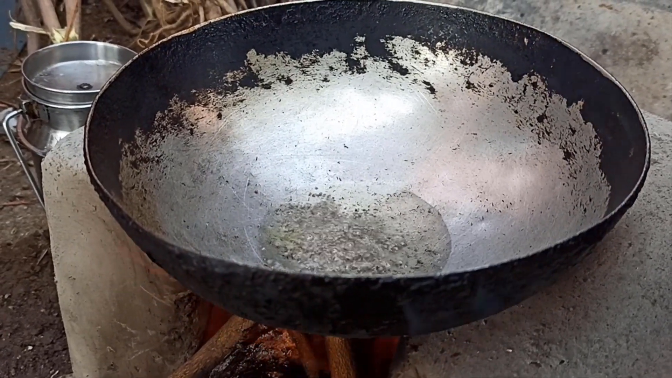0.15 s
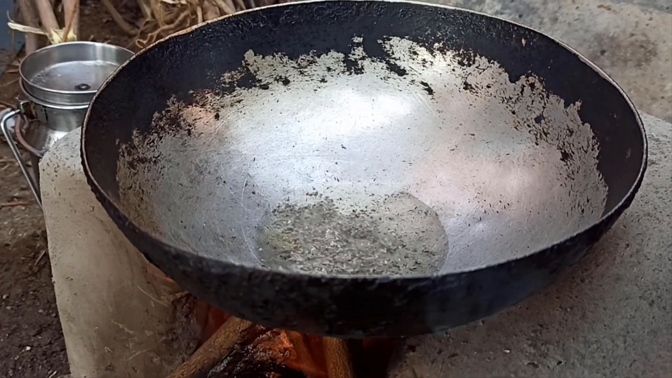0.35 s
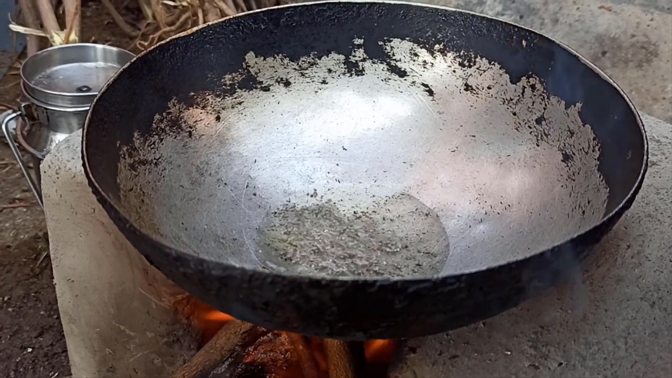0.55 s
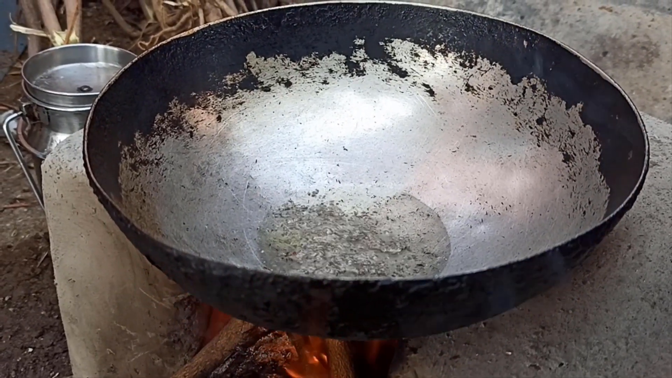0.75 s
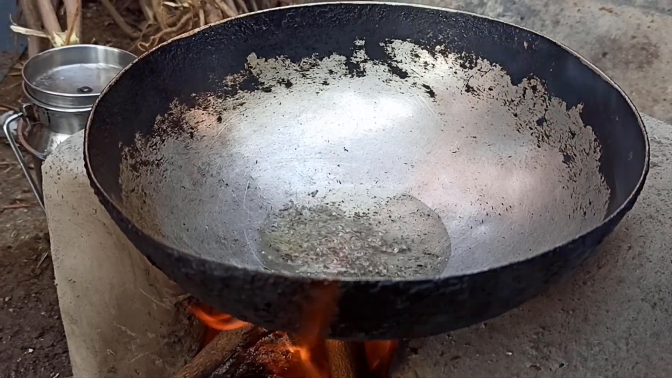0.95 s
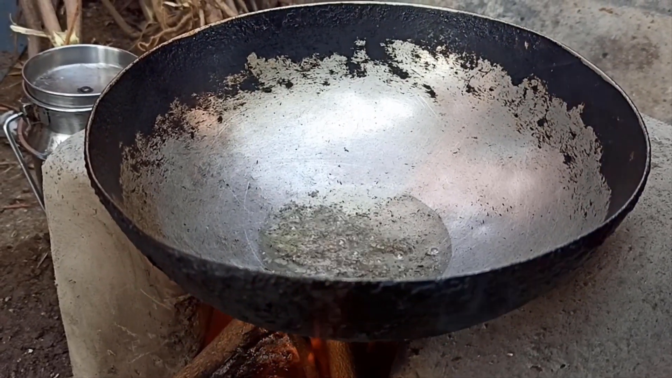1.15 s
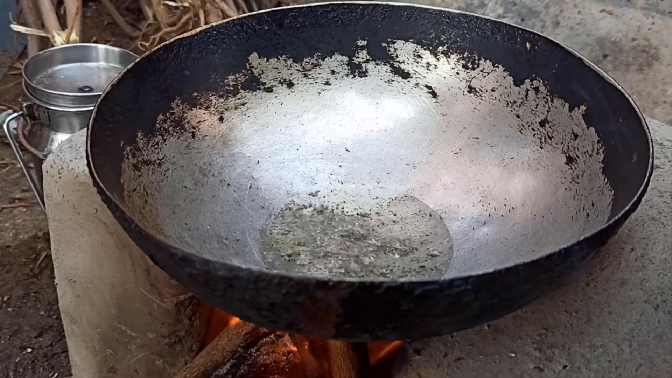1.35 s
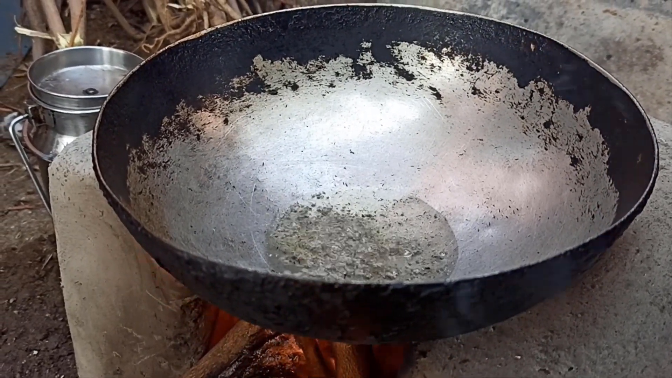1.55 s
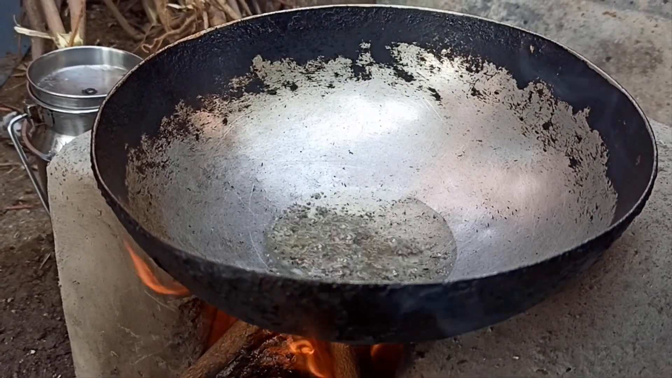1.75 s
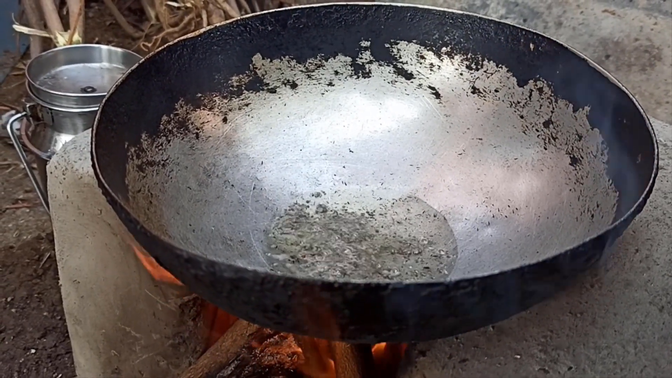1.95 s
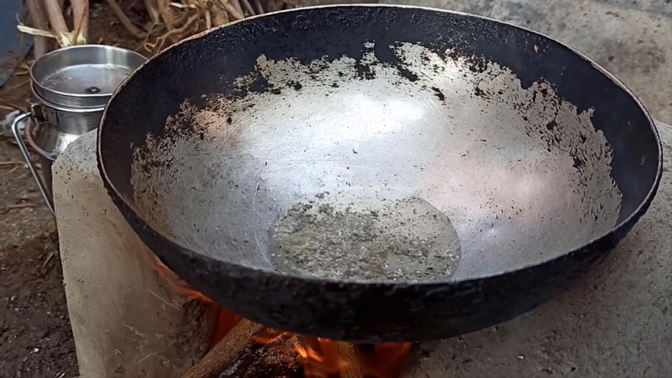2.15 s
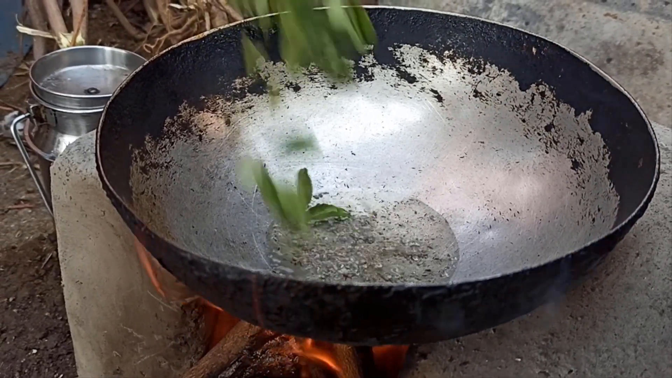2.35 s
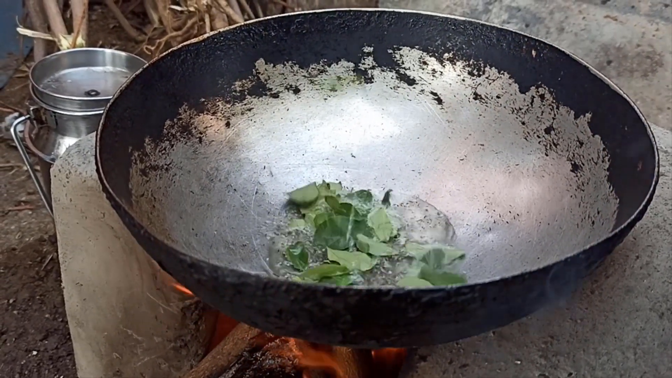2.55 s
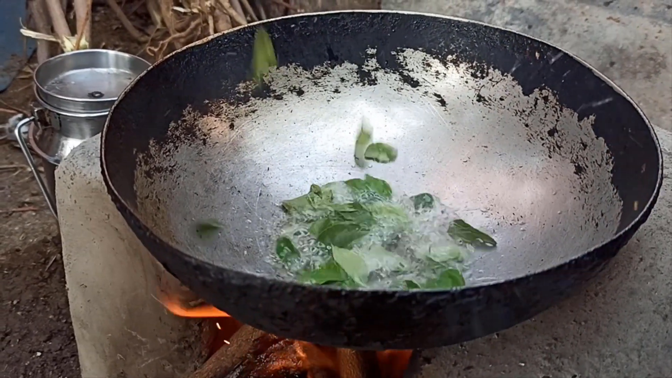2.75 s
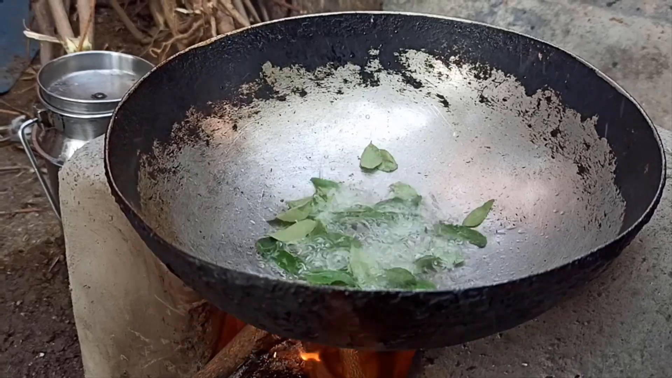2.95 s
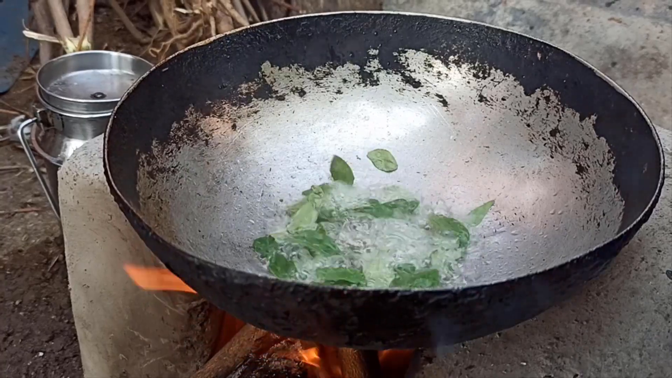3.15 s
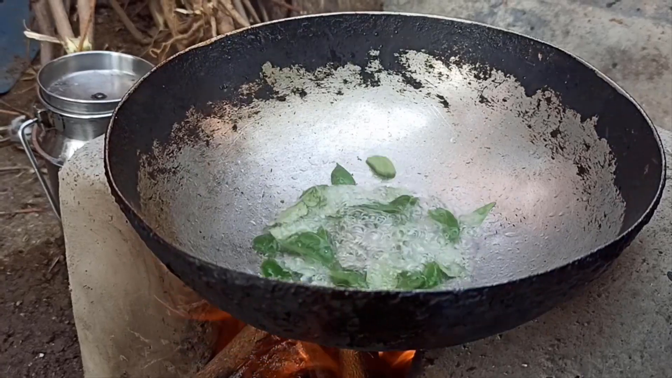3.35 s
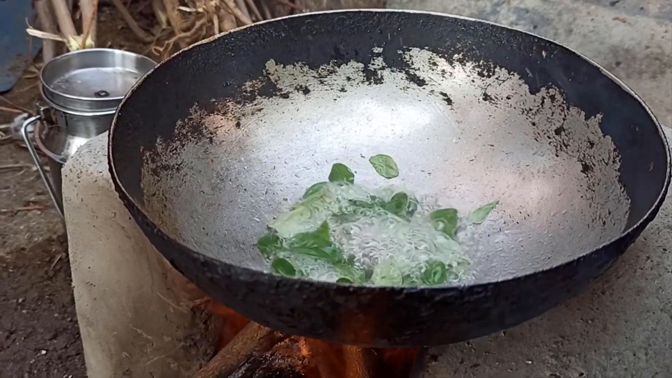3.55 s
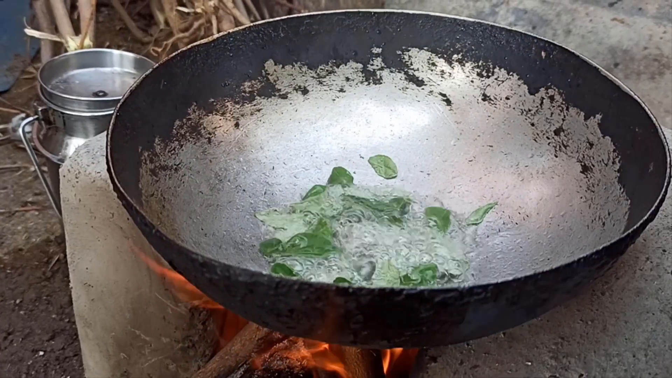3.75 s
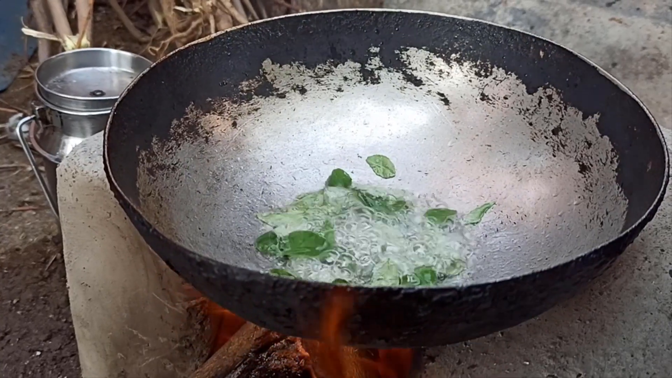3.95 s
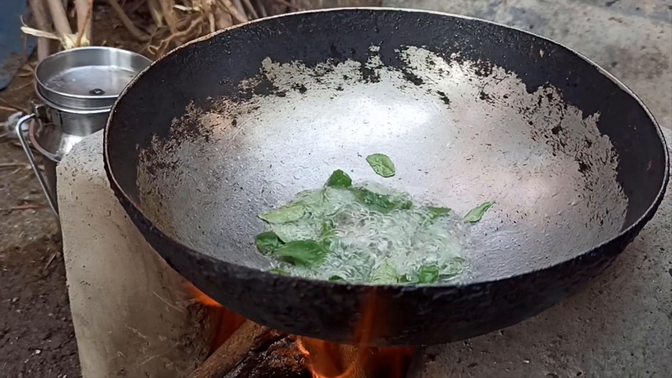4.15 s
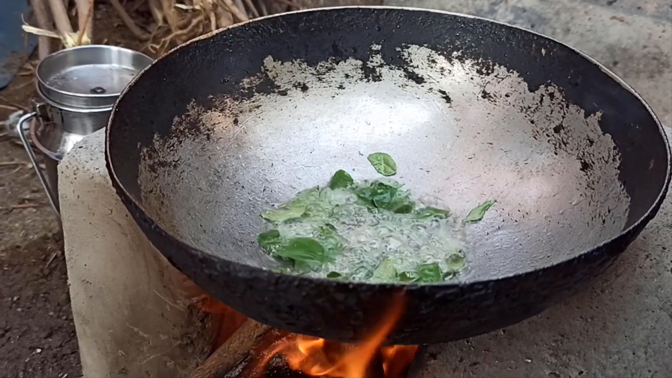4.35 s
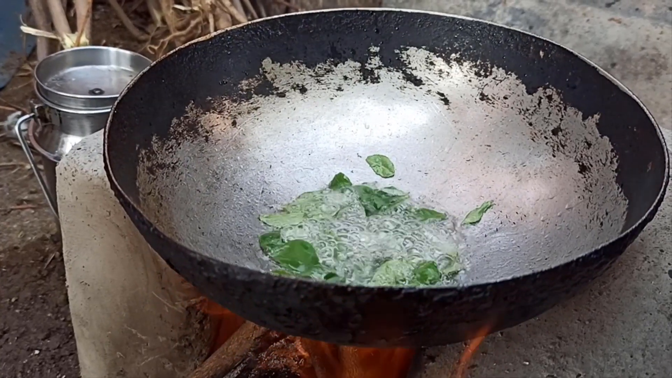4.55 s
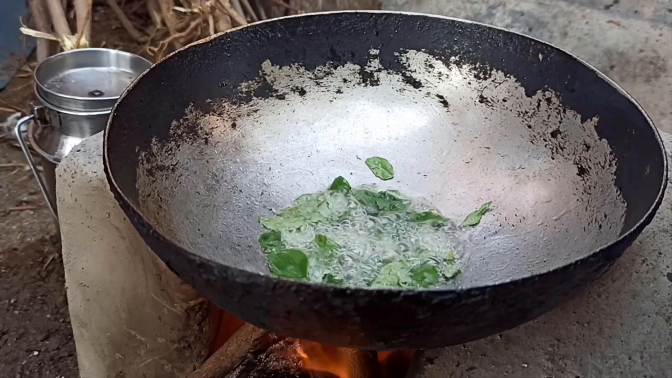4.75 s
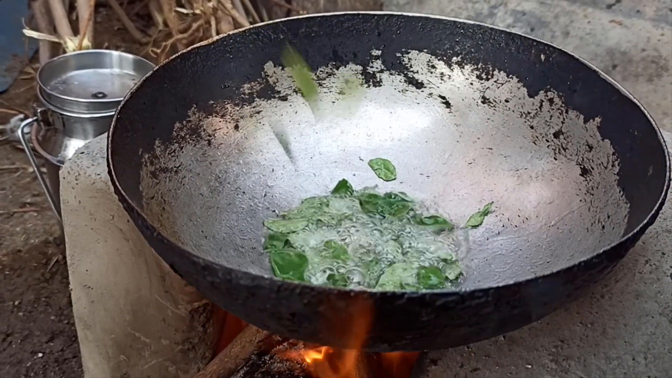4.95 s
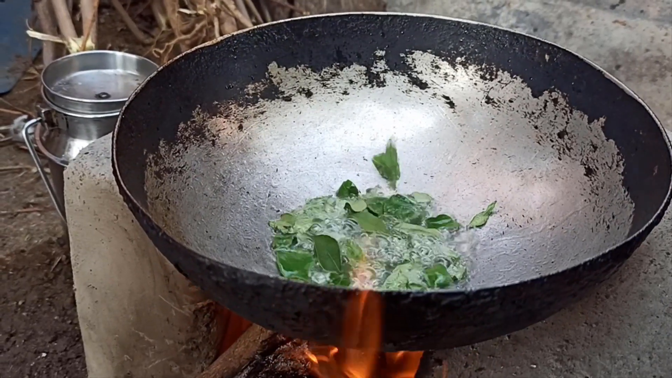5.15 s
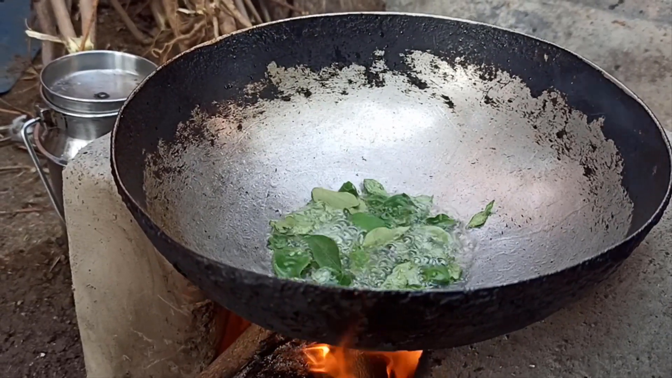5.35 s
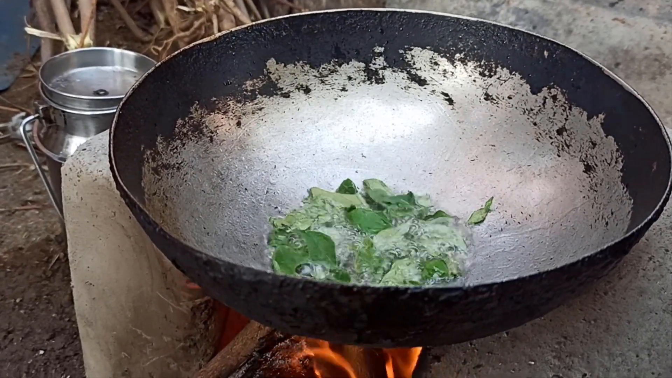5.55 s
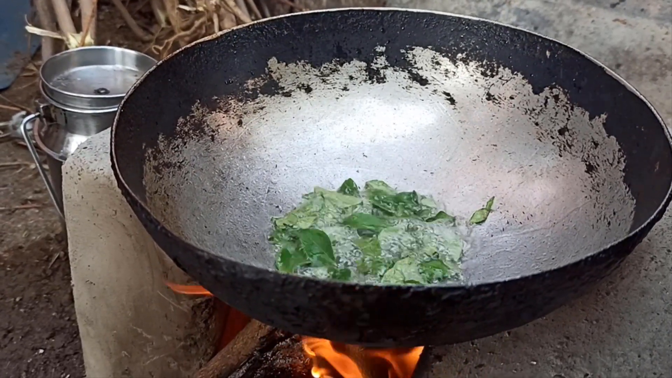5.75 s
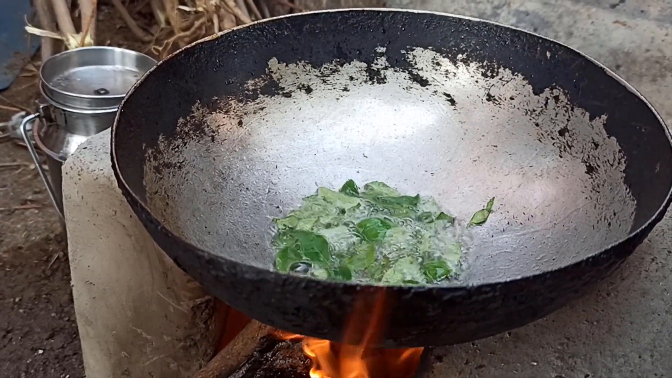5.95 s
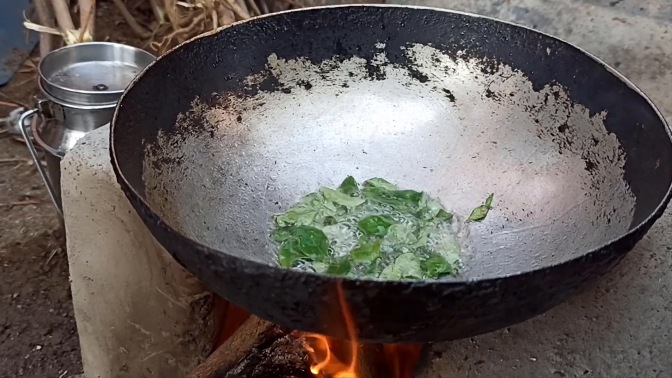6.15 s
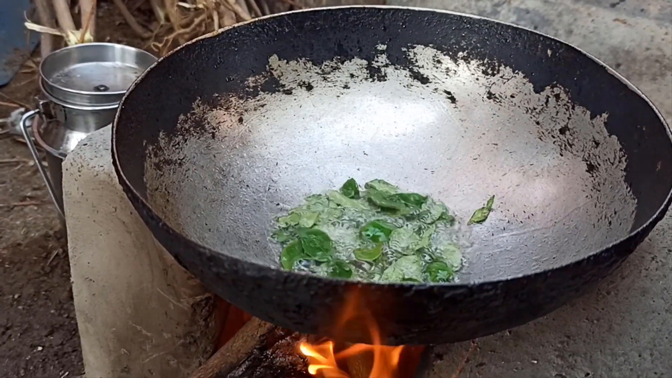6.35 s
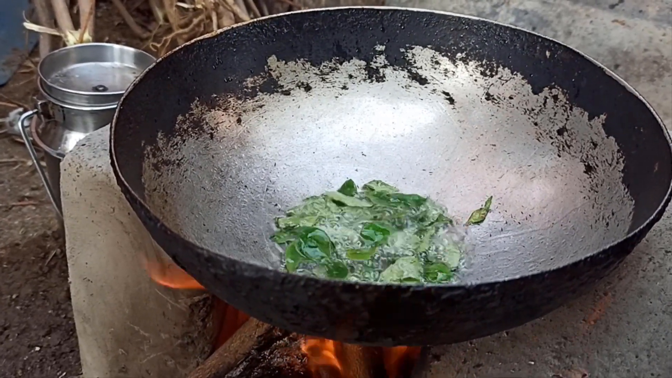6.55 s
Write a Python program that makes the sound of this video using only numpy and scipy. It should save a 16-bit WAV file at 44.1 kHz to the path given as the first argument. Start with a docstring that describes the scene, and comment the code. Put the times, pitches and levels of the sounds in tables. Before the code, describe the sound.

Quiet pops in an iron pan, a brief bird chirp, then a sudden violent burst of frying leaves that settles to uneven crackle and spatter.

```python
"""Seeds pop in hot oil in an iron pan over a wood fire outdoors, above a far engine's drone; a bird chirps.
Fresh leaves are thrown in and the oil erupts: steam bubbles burst as thumps, snaps and spray over a fine fizz.
Each burst is a click with a dying hiss that rings the pan's resonances; a wall nearby echoes the pan.
The air and a far rush are shaped noise, the drone is a stack of engine orders, the chirps are falling sines."""
import sys
import numpy as np
from scipy import signal
from scipy.fft import rfft, irfft, next_fast_len
from scipy.io import wavfile

SR = 44100
rng = np.random.default_rng(int(sys.argv[2]) if len(sys.argv) > 2 else 0)


def invert_db(x):
    """Field ratio 10**(x/20) for x, a level in decibels (scalar or array-like)."""
    u = np.asarray(x, float) / 20
    return 10 ** u


def master_out(mix):
    """Clip the mix to full scale and print it as 16-bit PCM to the path in sys.argv[1]."""
    frames = np.transpose(np.atleast_2d(mix))
    ceiling = np.clip(frames, -1, 1)
    pcm = np.round(ceiling * 32767).astype(np.int16)
    wavfile.write(sys.argv[1], SR, pcm)


N = 295470


def rms_one(x):
    """Scales a signal to rms 1."""
    return x / np.sqrt(np.mean(x ** 2) + 1e-20)


def at_hz(points, hz):
    """Reads a curve of (Hz, value) points along log frequency."""
    p = np.array(points, float)
    return np.interp(np.log(hz + 1), np.log(p[:, 0] + 1), p[:, 1])


def drift(rate_hz):
    """Slow random wander of spread 1: noise through two equal low-pass poles at rate_hz."""
    every = 40  # samples between computed points
    r = np.exp(-2 * np.pi * every * rate_hz / SR)
    noise = rng.standard_normal(N // every + 2002)
    slow = rms_one(signal.lfilter([1], [1, -2 * r, r * r], noise)[2000:])
    return np.interp(np.arange(N) / every, np.arange(len(slow)), slow)


def resonate(x, hz, width_hz):
    """Two-pole resonance with gain 1 on top."""
    r = np.exp(-np.pi * width_hz / SR)
    zeros = np.array([1, 0, -1]) * (1 - r * r) / 2
    poles = [1, -2 * r * np.cos(2 * np.pi * hz / SR), r * r]
    return signal.lfilter(zeros, poles, x + 1e-18)


def pair(alike):
    """Two noise channels that share a part: alike is their correlation."""
    mid, side = rng.standard_normal((2, N))
    alike = np.clip(alike, 0, 1)
    return np.sqrt(alike) * mid + np.sqrt(1 - alike) * np.array([side, rng.standard_normal(N)])


def grains(per_s, spread_db):
    """Random clicks, a few far larger than the rest; rms 1."""
    sizes = invert_db(spread_db * np.minimum(rng.exponential(1, N), 4))
    return rms_one(sizes * (rng.random(N) < per_s / SR))


# The frying in the pan. Each row: time in seconds, relative level of the fizz in dB,
# relative level of the boil (large bubbles under the leaves) in dB.
FRYING_LEVELS = [(0, -55, -70), (1.3, -60, -60.5), (2.28, -56.5, -67), (2.34, -42, -49), (2.44, -41, -46),
                 (2.46, -37, -28), (2.53, -30, -25.5), (2.6, -40, -29), (2.68, -30.5, -24),
                 (2.85, -30.5, -27), (3.1, -29, -33.5), (3.35, -35.5, -37), (3.6, -31.5, -42.5),
                 (4.3, -34.5, -42.5), (4.798, -34, -46), (5.401, -36.5, -44.5), (5.9, -37.5, -45),
                 (6.7, -42, -53)]
# Resonances of the pan bowl, by the part of a burst that drives them.
# Each row: frequency in Hz, width in Hz, relative level in dB.
THUMP_MODES = [(60, 67, -76), (304, 3470, -5), (720, 503, 9), (980, 630, -3)]
KNOCK_MODES = [(1233, 540, -7), (1750, 340, 2), (2360, 280, 0.5), (2740, 170, -7)]
SNAP_MODES = [(3550, 400, -2), (3950, 400, -2), (4300, 400, -1), (4650, 350, -1), (5300, 800, -5)]
SPRAY_MODES = [(6410, 535, -0.5), (7400, 303, 3), (8120, 1620, 0.5), (10200, 1400, 3), (12960, 1500, -13.5),
               (13800, 5400, -10)]
# How thump, knock, snap and spray are driven. Each row: click gain in dB, hiss relative to the click in dB,
# hiss 60 dB decay in seconds, fine-grain gain in dB, steam gain in dB, left-right likeness from 0 to 1.
BURST_PARTS = [(26.3, -30, 0.01, -8.5, -19, 1), (25.62, -21.5, 0.012, -5, 6, 0.36),
               (26.92, -13, 0.0069, -1, 1, 1), (20.95, -5.5, 0.0053, -8.5, 7.5, 0.14)]


def frying():
    """Every burst, large or fine, is a click with a dying hiss that rings the bowl anew; steam hisses under all."""
    t = np.arange(N) / SR
    s, fizz_db, boil_db = np.transpose(FRYING_LEVELS)
    boil_db, fizz_db = np.interp(t, s, boil_db), np.interp(t, s, fizz_db)
    surge = invert_db(2.3 * drift(35))  # bubbles come in clumps
    boil, fizz = invert_db(boil_db) * surge, invert_db(fizz_db) * surge
    boil_grains = invert_db(9) * grains(350, spread_db=3.5)
    fizz_grains = invert_db(7) * grains(1200, spread_db=5)

    rows = np.vstack([seed_pops(), leaf_bursts(boil_db)])
    at = np.round(rows[:, 0] * SR).astype(int)
    pitch_hz = rows[:, 5]
    signs = rng.choice([-1, 1], N)
    luck_db = 2.5 * np.tanh(rng.standard_normal((len(rows), 20)))  # chance per burst and resonance

    out, mode = np.zeros((2, N)), 0
    all_modes = THUMP_MODES, KNOCK_MODES, SNAP_MODES, SPRAY_MODES
    for k, (modes, part) in enumerate(zip(all_modes, BURST_PARTS)):
        click_db, hiss_db, t60_s, fine_db, steam_db, alike = part
        treble = k > 1  # snap and spray
        bed = (fizz if treble else boil) * invert_db(0.48 * drift(4))  # each part flickers on its own
        hiss = pair(alike)
        fine = bed * (fizz_grains if treble else boil_grains)
        if treble:
            fine = fine + 0.5 * boil * boil_grains  # large bubbles crack in the treble too
        for hz, width_hz, level_db in modes:
            # a snap favours resonances near its own pitch
            near_db = 4 - 30 * np.abs(np.log(hz / pitch_hz)) if modes is SNAP_MODES else 0
            clicks = fine * invert_db(fine_db)
            clicks[at] += invert_db(rows[:, 1 + k] + click_db + near_db + luck_db[:, mode])
            decay = invert_db(-60 / (t60_s * SR))
            dying = signal.lfilter([invert_db(hiss_db)], [1, -decay], clicks + 1e-18)
            push = clicks * signs + (dying + bed * invert_db(steam_db)) * hiss
            out += invert_db(level_db) * (-1) ** mode * resonate(push, hz, width_hz)
            mode += 1
    return out


# Colour of the microphone pair. Each row: frequency in Hz, left minus right in dB.
PORT_BALANCE = [(60, -23), (180, -2), (550, 0), (1650, 0.5), (4970, -1.5), (15000, 3)]


def ports(x):
    """The left microphone port hears the pan a moment later; the two differ in colour."""
    left_lag_s = 2.3 / SR
    size = next_fast_len(N + 2048)
    hz = np.fft.rfftfreq(size, 1 / SR)
    tilt = invert_db(at_hz(PORT_BALANCE, hz) / 2)
    left = np.exp(-2j * np.pi * hz * left_lag_s) * tilt
    return irfft(rfft(x, size) * np.array([left, 1 / tilt]), size)[:, :N]


# Colour of the background noise as heard, with a gap at 8.5 to 11 kHz.
# Each row: frequency in Hz, relative density in dB per Hz.
BACKGROUND_COLOUR = [(36, -55), (62, -5), (212, -3), (338, -10), (1030, -14), (4260, -20.5), (5760, -23.5),
                     (7260, -20.5), (8540, -44), (9380, -44), (11000, -55), (12100, -30), (14900, -25),
                     (16000, -37)]
# Width of the background at the microphones. Each row: frequency in Hz, left-right likeness (below 0: opposed).
BACKGROUND_LIKENESS = [(60, 0.65), (240, 0.56), (950, -0.26), (3770, -1.23), (15000, 0.17)]


def air():
    """Fire, breeze and far traffic: soft noise, alike on both sides in the bass, opposed in the lower treble."""
    hz = np.fft.rfftfreq(N, 1 / SR)
    mid, side = rfft(rng.standard_normal((2, N)))
    alike = np.clip(at_hz(BACKGROUND_LIKENESS, hz), -1, 1)
    sides = np.sqrt(1 + alike) * mid + np.sqrt(1 - alike) * side * [[1], [-1]]
    noise = rms_one(irfft(invert_db(at_hz(BACKGROUND_COLOUR, hz)) * sides, N))
    return invert_db(-49.5 + drift(2.3)) * noise  # dB rms, wandering by 1 dB


# Engine orders four to eight, far off. Each entry: level in dB rms before swell, fade and wavering.
ORDER_LEVELS = [-56, -58.5, -54.5, -59.5, -61]
# The engine's course. Each row: time in seconds, firing rate in Hz, swell in dB.
ENGINE_COURSE = [(0, 36.96, -5.5), (3.3, 36.4, -3), (4.0, 36.2, 3), (5.0, 35.3, -0.5), (6.7, 34.5, 3.5)]


def drone():
    """Orders of a far engine that slowly runs down, wavering apart in level; those above the fifth fade."""
    t = np.arange(N) / SR
    s, hz, swell_db = np.transpose(ENGINE_COURSE)
    turns = np.cumsum(np.interp(t, s, hz) * (1 + 0.003 * drift(1.65))) / SR
    swell_db = np.interp(t, s, swell_db)
    fade_db = 8 * np.maximum(t - 4.6, 0)  # 8 dB per second from 4.6 s on
    out = np.zeros(N)
    for order, db in enumerate(ORDER_LEVELS, 4):
        level_db = db + swell_db - fade_db * (order > 5) + 1.8 * drift(5)
        out += np.sqrt(2) * invert_db(level_db) * np.sin(2 * np.pi * order * turns)
    return out


# A far rush that swells. Each row: time in seconds, level in dB rms before its flicker.
RUSH_SWELL = [(0, -54.5), (.8, -54), (1.1, -51.5), (1.35, -47.5), (1.65, -54.5), (1.85, -56.5), (6.7, -52)]


def rush():
    """Broad noise in three resonances, far off."""
    noise = pair(0.64)
    body = resonate(noise, 2050, 530)
    body = body + invert_db(0.5) * resonate(noise, 870, 120) + invert_db(-1) * resonate(noise, 1310, 280)
    level_db = np.interp(np.arange(N) / SR, *np.transpose(RUSH_SWELL))
    return invert_db(level_db + 1.4 * drift(14)) * rms_one(body)


def yard(x):
    """One wall echo, sharp with a rough edge, and a short scatter from the ground and the stove."""
    wall_s, scatter_t60_s = 0.0162, 0.065
    t = np.arange(int(0.12 * SR)) / SR
    edge = invert_db(-49) * np.exp(-0.5 * ((t - wall_s) / 0.0036) ** 2)
    scatter = invert_db(-15 - 60 * t / scatter_t60_s) / 20 * (t > 0.002)
    # mostly a different roughness on each side
    rough = rng.standard_normal(len(t)) + 2.4 * rng.standard_normal((2, len(t)))
    answer = (edge + scatter) * rough
    answer[:, round(wall_s * SR)] += invert_db(-45)
    return x + signal.fftconvolve(x, answer, axes=1)[:, :N]


def burst_rows(s, body, snap, spray, pitch_hz):
    """Splits the body of each burst into thump and knock; small bubbles lose the thump faster."""
    full_body_db, loss_per_db = -16, 3.67
    thump = body - 5.5 - loss_per_db * np.maximum(full_body_db - body, 0)
    return np.c_[s, thump, body - 2.5, snap, spray, pitch_hz]


# Seeds popping in the pan. Each row: start in seconds, relative levels of body, snap and spray in dB,
# snap pitch in Hz.
SEED_POPS = [(0.0302, -48, -36, -58, 3700), (0.0528, -20.5, -20.5, -25, 4100),
             (0.1454, -48, -31, -26.5, 4260), (0.2617, -49, -13, -39, 4700),
             (0.3291, -21, -16.5, -18.5, 4300), (0.3982, -25, -26.5, -35, 4600),
             (0.5288, -39, -28.5, -19.5, 4550), (0.5898, -30, -17.5, -45, 5350),
             (0.7702, -21, -21.5, -24, 3740), (0.9039, -47, -26, -46, 3760),
             (0.9312, -32, -13, -19.5, 4300), (1.0154, -34, -23, -35, 3900),
             (1.0643, -30, -29.5, -30.5, 4280), (1.1597, -29, -32, -21, 3930),
             (1.2083, -29.5, -21.5, -30, 3770), (1.3076, -38, -21.5, -34, 4330),
             (1.3344, -33, -9.5, -20.5, 3730), (1.4615, -44, -29, -37, 4300), (1.649, -57, -9.5, -20, 4650),
             (1.7255, -41, -33, -25.5, 4300), (1.92, -36, -24, -21.5, 4800), (2.0005, -43, -36, -21, 4570),
             (2.1932, -34, -19, -20, 3900), (2.3309, -46, -26, -21, 4670), (2.3451, -43, -43, -17, 5190)]


def seed_pops():
    """Seeds burst in the oil: rows of start, thump, knock, snap, spray and pitch; one has a deep thump."""
    rows = burst_rows(*np.transpose(SEED_POPS))
    deep_pop = np.argmin(abs(rows[:, 0] - 0.5288))
    rows[deep_pop, 1] = -31  # relative thump in dB
    return rows


def bird():
    """Short whistles that fall and level off, blurred by the trees on the way."""
    count, first_s, every_s, long_s = 7, 0.301, 0.0975, 0.065
    out = np.zeros(N)
    for s in first_s + every_s * np.arange(count):
        start_hz, end_hz = 5350 * (1 + 0.02 * rng.standard_normal()), 4860
        u = np.clip((np.arange(N) / SR - s) / long_s, 0, 1)
        hz = end_hz + (start_hz - end_hz) * (1 - u) ** 2.57
        out += np.sin(np.pi * u) * np.sin(2 * np.pi * np.cumsum(hz) / SR)
    blur = 0.8 + 0.45 * np.array([drift(150), drift(150)])
    return invert_db(-50) * out * blur


# Single bursts after the leaves go in, loud and faint, one of them (6.156 s) a wall echo.
# Each row: start in seconds, relative levels of body, snap and spray in dB.
SINGLE_BURSTS = [(2.3715, -13, -9, -15.5), (2.4516, -5, -14, -14), (2.4568, -1.5, -14, -11),
                 (2.4627, -20.5, -20, -31), (2.4734, -14, -9, -13), (2.4851, -5, -10, -3),
                 (2.5047, -4, -8, -13), (2.5222, -13.5, -14, -9), (2.5532, -6, -11, -29),
                 (2.5716, -19, -16, -32), (2.6196, -42, -14, -19), (2.6336, -6, -1, -10),
                 (2.6685, -9, -7, -18), (2.6833, -21.5, -14, -26), (2.7418, -39, -5, -34),
                 (2.7521, -18, -13, -5), (2.7907, -3, 0, -3), (2.8285, -12.5, -3, -0.5),
                 (2.8796, -11.5, -6.5, -10), (2.8978, -14, -10, -19), (2.9123, -25, -19, -9),
                 (2.935, -6, -10.5, -13.5), (2.9679, -12.5, -21, -29), (2.985, -11, -11, -9),
                 (3.0227, -9.5, -4, -20), (3.0365, -9.5, -11, -6), (3.0679, -4, -9.5, -11.5),
                 (3.1341, -10.5, -10.5, -10), (3.1606, -5.5, -15, -9), (3.1857, -10, -16, -34),
                 (3.2171, -13, -15, -23), (3.2415, -11.5, -20, -8.5), (3.2639, -11.5, -12, -11.5),
                 (3.2812, -10.5, -5, -12.5), (3.3146, -9, -13.5, -13), (3.3602, -13.5, -13.5, -17),
                 (3.428, -16, -21, -8), (3.4448, -16, -17, -20), (3.4739, -10, -13, -31),
                 (3.4935, -12, -24, -36), (3.5103, -9.5, -9.5, -15), (3.5805, -17, -21, -14.5),
                 (3.5952, -16.5, -18, -37), (3.7607, -16, -28, -11), (3.8044, -39, -23, -17),
                 (3.8459, -9.5, -9, -15), (3.9341, -29, -17, -32), (4.037, -19.5, -17, -34),
                 (4.0725, -12.5, -13, -16), (4.1203, -12.5, -15, -10.5), (4.1656, -10, -11.5, -12),
                 (4.2058, -14, -16.5, -25), (4.2698, -6.5, -8.5, -35), (4.2964, -41, -13.5, -31),
                 (4.3165, -42, -25, -29), (4.3268, -46, -10, -43), (4.3977, -23.5, -22, -66),
                 (4.424, -18, -13, -23), (4.4473, -18, -14, -18), (4.5657, -21, -8.5, -15),
                 (4.6282, -19, -6, -19), (4.6556, -15, -25, -16), (4.66, -19.5, -16, -22),
                 (4.687, -34, -13, -18), (4.7015, -36, -26, -38), (4.7178, -20, -8, -31),
                 (4.7612, -46, -32, -16), (4.7692, -47, -39, -28), (4.7943, -43, -8.5, -20),
                 (4.8623, -43, -21.5, -14), (4.9071, -28, -4, -20), (4.9248, -20.5, -10, -37),
                 (4.9566, -15, -15.5, -12), (4.9952, -41, -26, -15), (5.0786, -9.5, -26, -11),
                 (5.096, -15, -6, -14), (5.11, -29, -30, -21), (5.1719, -16.5, -12, -32),
                 (5.1868, -9.5, -7, -8), (5.2319, -8, -9, -22), (5.2678, -8, -6, -3),
                 (5.3028, -12, -9.5, -2.5), (5.3497, -17, -16, -22), (5.4044, -14, -14, -15),
                 (5.4259, -15.5, -7, -8.5), (5.455, -12, -12, -19), (5.4711, -13, -18, -20),
                 (5.4923, -33, -14, -11), (5.5014, -12.5, -18, -29), (5.5347, -5.5, -11, -22),
                 (5.5424, -12, -12, -16.5), (5.6349, -11.5, -6, -7), (5.651, -13.5, -7.5, -23),
                 (5.658, -7.5, -23, -14), (5.6957, -11, -22, -32), (5.7099, -4.5, -11, -10),
                 (5.7289, -18, -10.5, -20), (5.7507, -15, -6, -17), (5.7899, -11.5, -8.5, -31),
                 (5.8171, -6.5, -5.5, -8), (5.8353, -15, -14, -23), (5.8657, -14, -15, -9),
                 (5.9509, -39, -24, -12.5), (5.9923, -18, -21, -27), (6.0468, -5, -8.5, -19.5),
                 (6.1133, -27, -22.5, -28), (6.1396, -5, -16, -19), (6.1558, -12.5, -20, -23),
                 (6.1996, -15.5, -5.5, -17), (6.2657, -38, -9.5, -27), (6.2743, -10, -29.5, -40),
                 (6.3002, -7, -3.5, -12), (6.3255, -12, -10.5, -10.5), (6.4363, -25, -17.5, -9),
                 (6.4715, -43, -40, -30), (6.497, -35, -17.5, -25), (6.5339, -44, -20, -41),
                 (6.6185, -39, -32, -28)]


def leaf_bursts(boil_db):
    """Single bursts, plus lesser ones at random, denser and louder as the boil rises; rows like the pops."""
    count, crowding = 130, 1.5  # lesser bursts; dB of rate per dB of boil
    full_db, spread_db = (-13, -14, -17), 4.5  # body, snap, spray at full boil; limit of chance
    share = np.cumsum(invert_db(crowding * boil_db))
    at = np.searchsorted(share, rng.random(count) * share[-1])
    chance_db = spread_db * np.tanh(rng.standard_normal((count, 3)))
    follow_db = 0.5 * (boil_db[at] - boil_db.max())  # half the boil's swing
    lesser_db = full_db + chance_db + follow_db[:, None]
    bursts = np.vstack([SINGLE_BURSTS, np.c_[at / SR, lesser_db]])
    pitch_hz = 4150 * np.exp(0.06 * rng.standard_normal(len(bursts)))
    return burst_rows(*bursts.T, pitch_hz)


def scene():
    """The pan in its yard at the two ports, with the surroundings added."""
    return ports(yard(frying())) + air() + drone() + bird() + rush()


def top_cut(x):
    """Nothing passes above the cut-off."""
    return signal.sosfilt(signal.butter(12, 16490, fs=SR, output="sos"), x)


def record(dry):
    """Peaks are rounded; the treble has a near-empty gap from 9.3 to 11.3 kHz and ends at 16.1 kHz."""
    x = 1.7 * np.tanh(dry / 1.7)
    below = signal.sosfilt(signal.cheby2(10, 45, 9300, fs=SR, output="sos"), x)
    above = signal.sosfilt(signal.cheby2(16, 50, 11300, "high", fs=SR, output="sos"), x)
    x = signal.sosfilt(signal.cheby2(14, 60, 16100, fs=SR, output="sos"), below + above)
    return top_cut(np.clip(x, -1, 1))


dry = scene()
out = record(dry)
master_out(out)
```